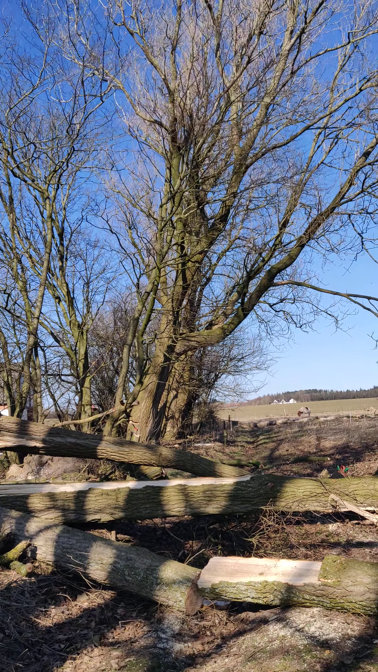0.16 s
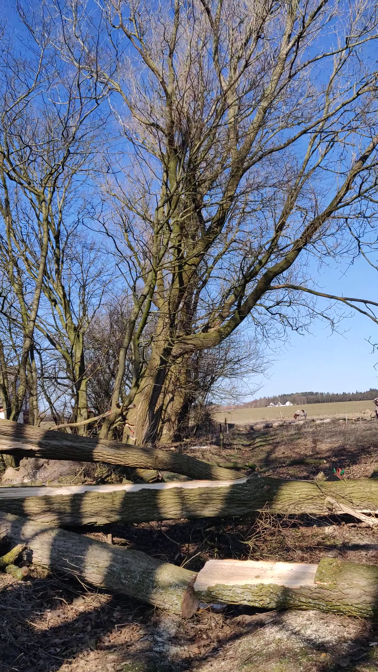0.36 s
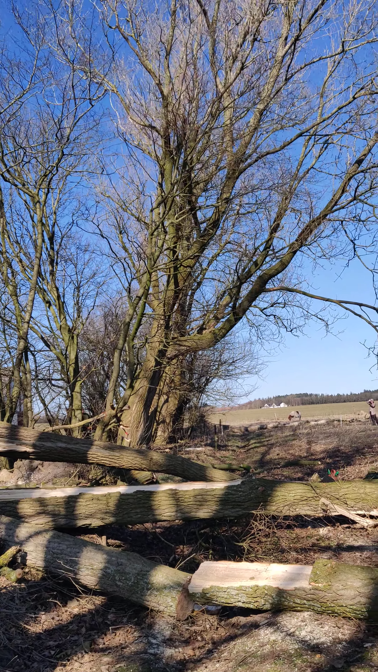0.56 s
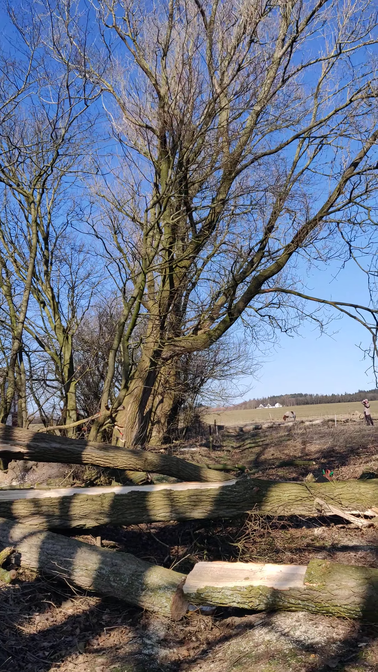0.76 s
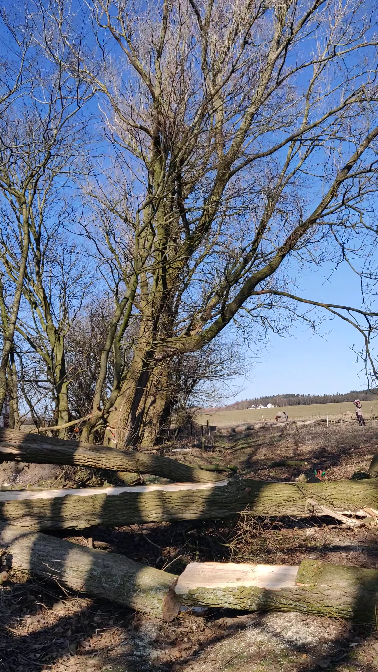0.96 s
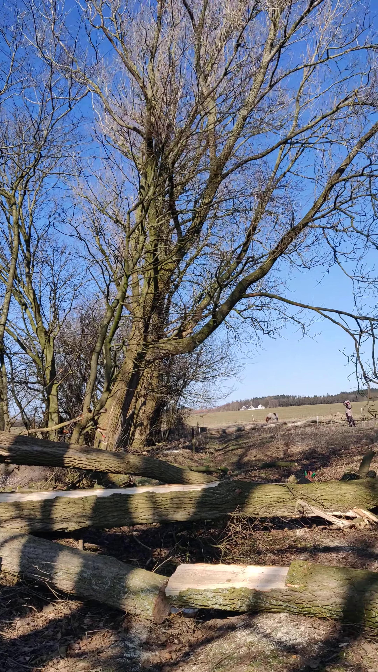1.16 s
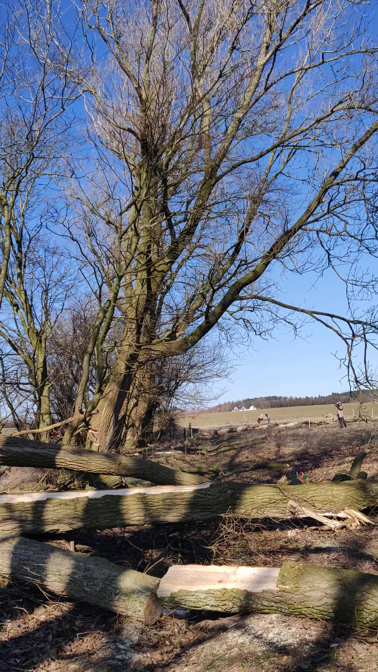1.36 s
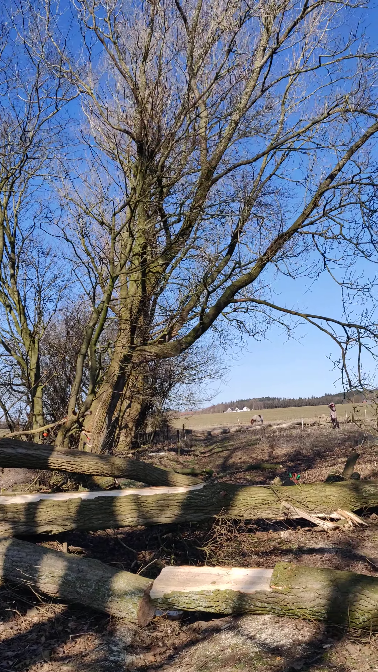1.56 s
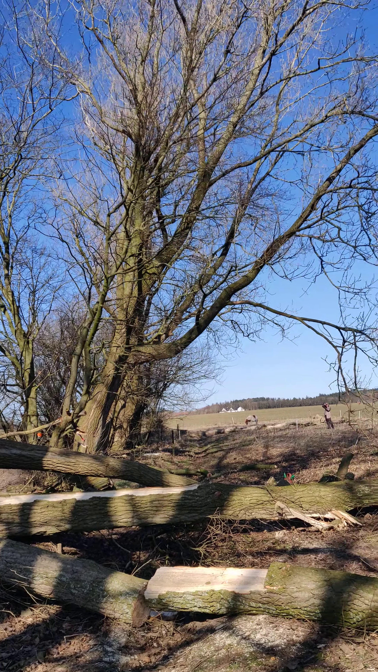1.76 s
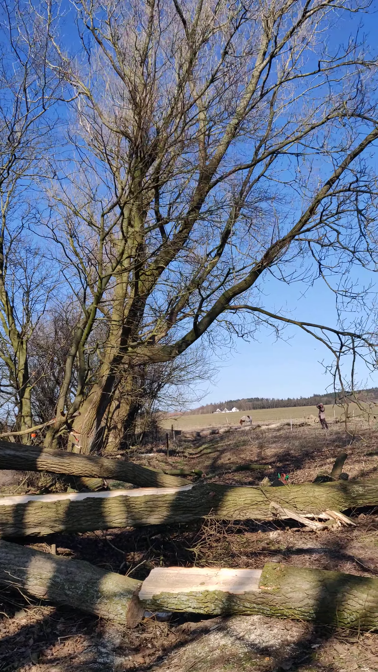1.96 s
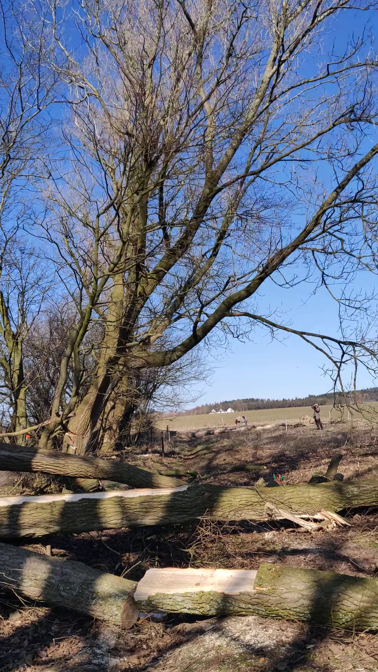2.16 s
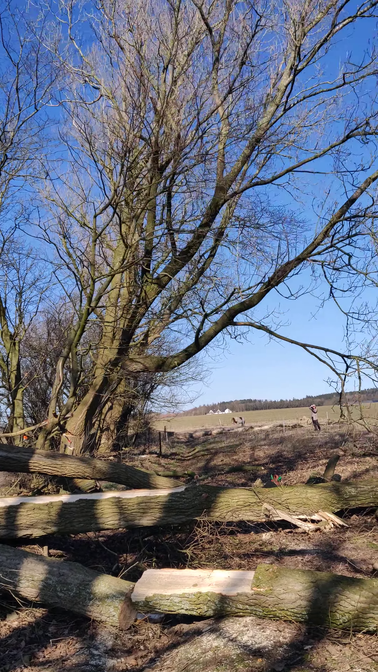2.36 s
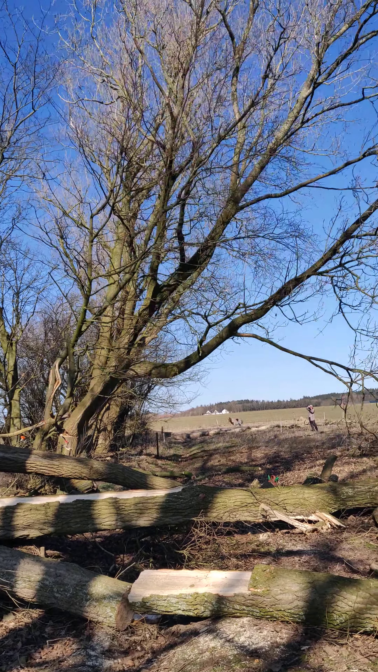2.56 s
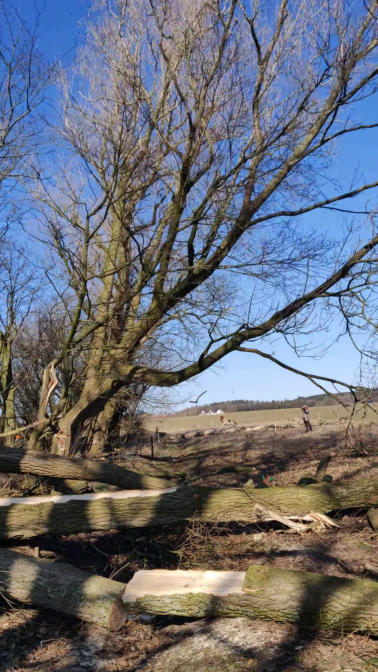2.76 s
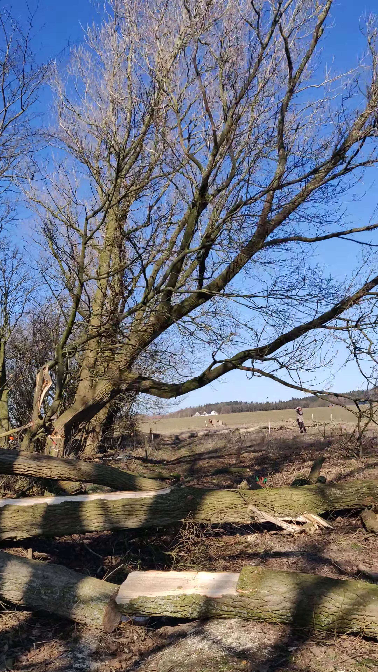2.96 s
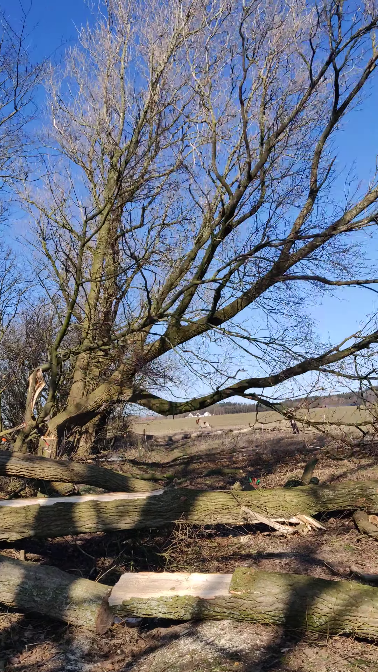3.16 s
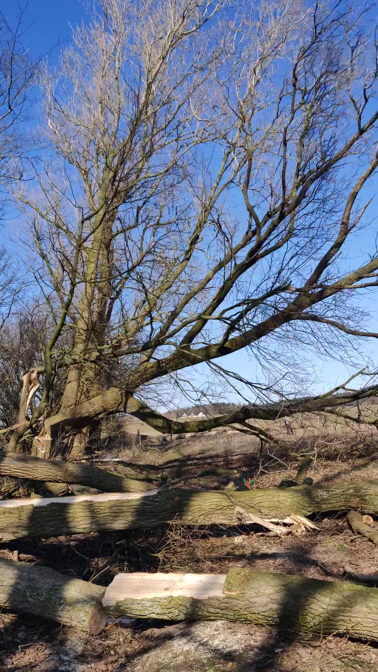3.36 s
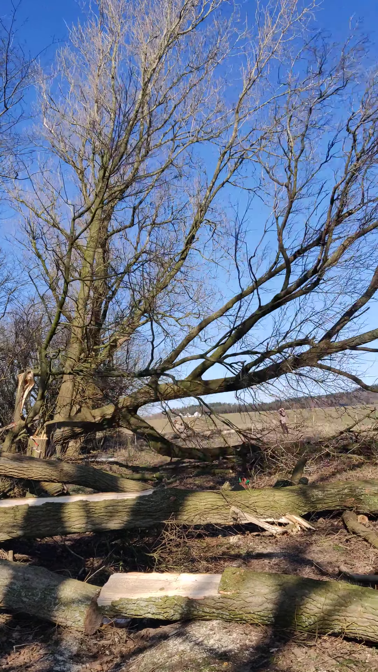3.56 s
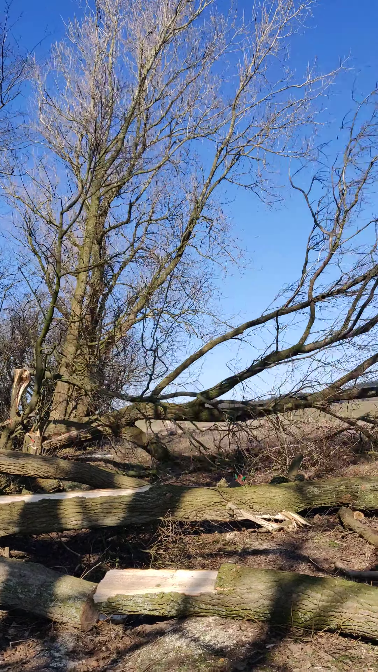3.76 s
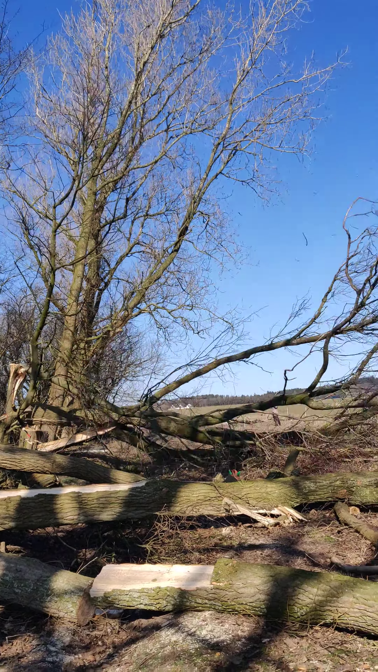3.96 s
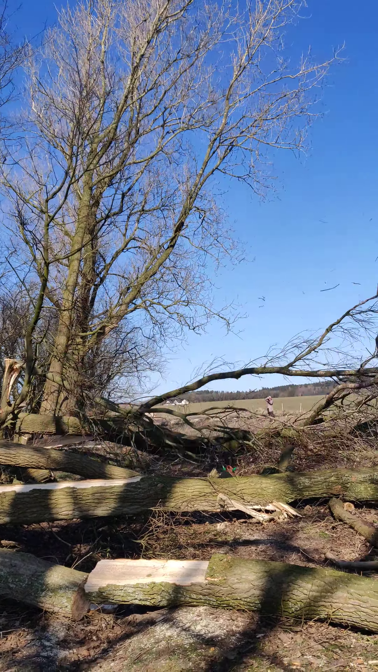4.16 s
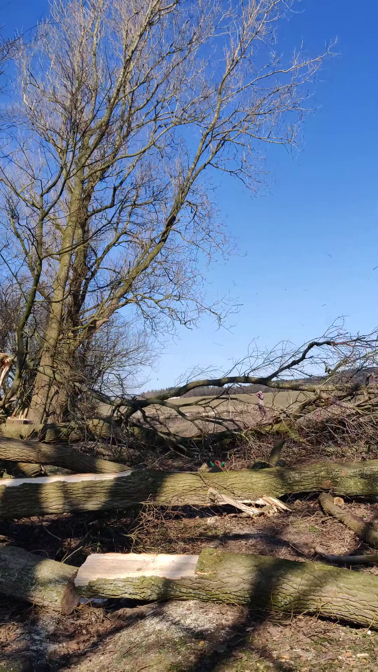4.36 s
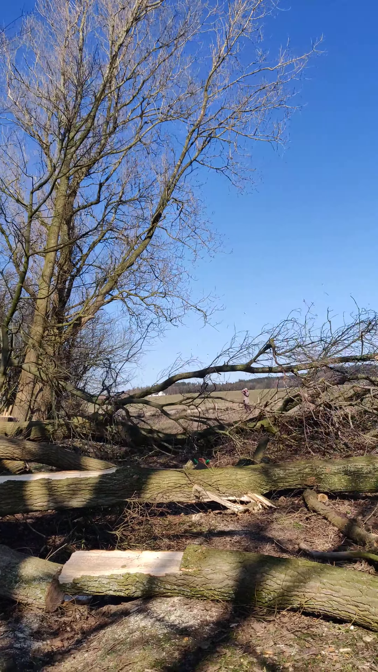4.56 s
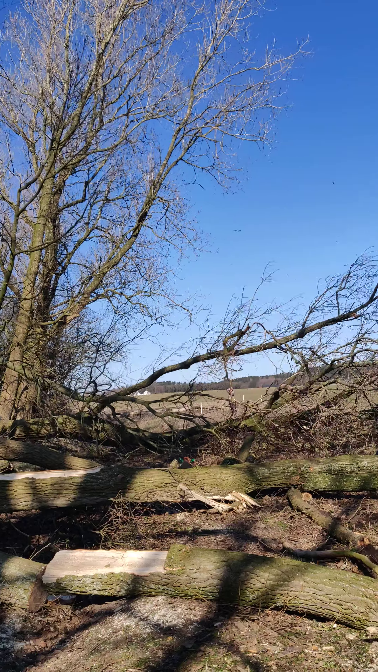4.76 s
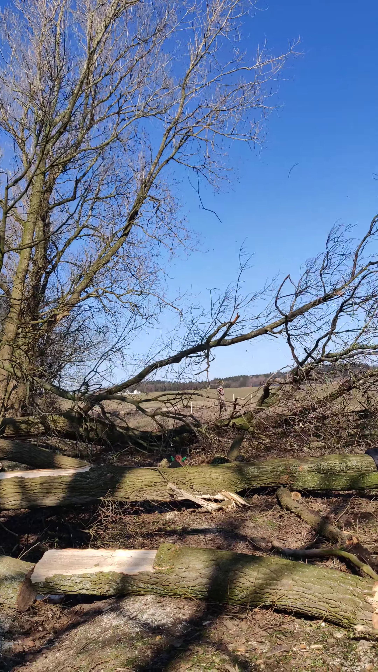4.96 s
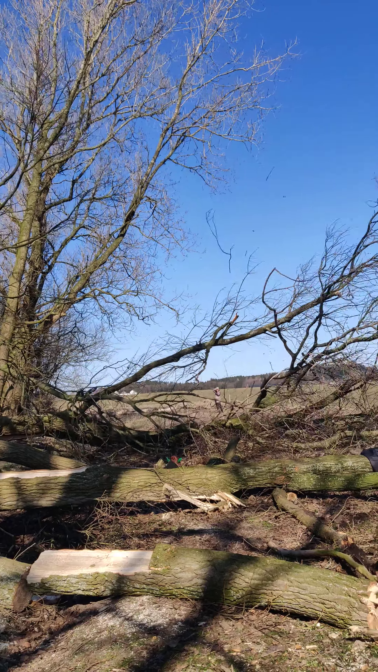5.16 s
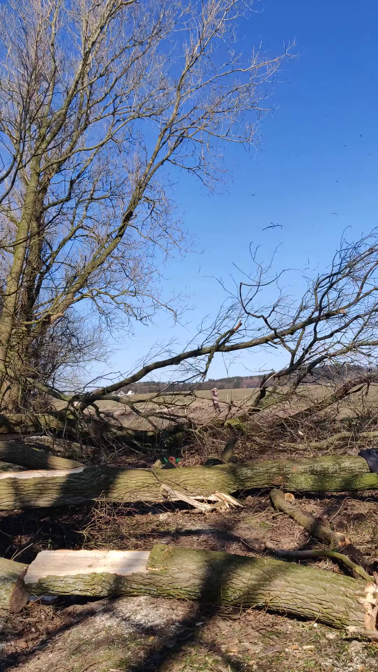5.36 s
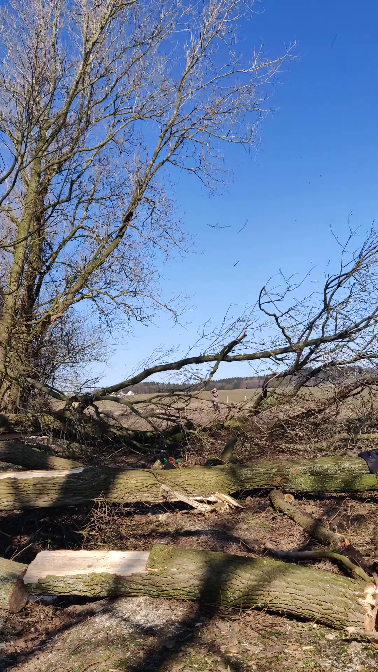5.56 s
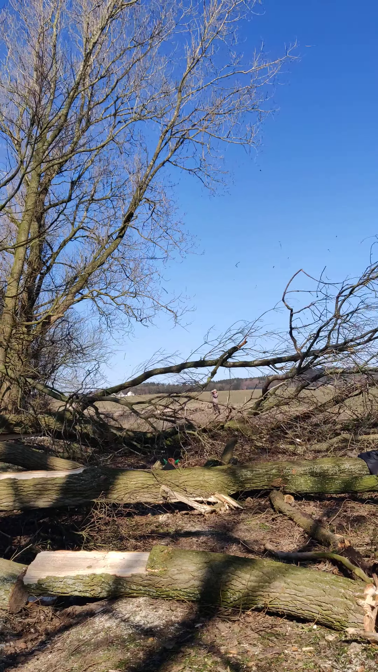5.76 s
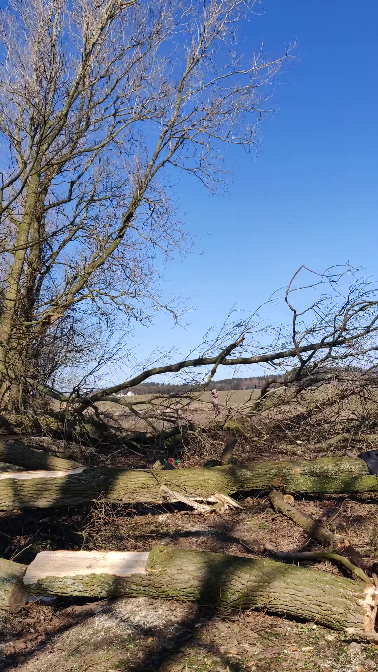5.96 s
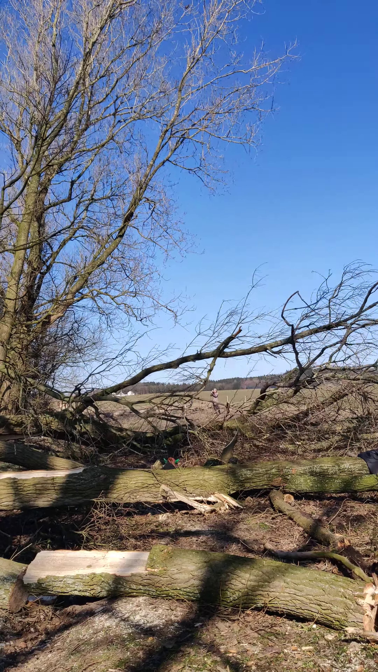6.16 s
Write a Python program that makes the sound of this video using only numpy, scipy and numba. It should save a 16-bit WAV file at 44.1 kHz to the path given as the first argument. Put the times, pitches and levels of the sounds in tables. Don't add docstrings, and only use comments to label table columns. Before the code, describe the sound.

Outdoors at a field edge, a leaning tree gives scattered dry cracks that grow louder and closer together. The trunk tears with hard woody snaps and low thumps, twigs rake and snap, then the crown hits the ground in a dense crunching crash with hollow knocks. It dies quickly to small snaps and pattering bits. Handheld phone some metres away, stereo, light wind rumble.

```python
import sys
import numpy as np
from scipy import signal
from scipy.fft import rfft, irfft
from scipy.io import wavfile
from scipy.ndimage import uniform_filter1d, minimum_filter1d, map_coordinates
from numba import njit

SR = 44100
rng = np.random.default_rng(int(sys.argv[2]) if len(sys.argv) > 2 else 0)


def elevation(decibels):
    levels = np.asarray(decibels, float)
    return 10 ** (levels / 20)


def master(y):
    cut = np.clip(np.atleast_2d(y).T, -1, 1)
    pcm = np.round(cut * 32767)
    wavfile.write(sys.argv[1], SR, pcm.astype(np.int16))


N = 273711


def wind():
    # [t/s, level/dB]
    gust_levels = [(0.0, -49), (0.52, -37.5), (0.78, -37), (0.9, -41), (1.55, -55), (1.76, -40.5),
                   (2.09, -36), (2.23, -52), (2.45, -36), (2.6, -42), (2.94, -39), (3.25, -34), (3.4, -40),
                   (3.77, -44), (4.13, -40), (4.5, -40.5), (5.64, -43), (6.0, -40), (6.1, -30), (6.21, -34)]
    both, left, right = rng.standard_normal((3, N))
    band = signal.butter(2, [22, 75], "band", fs=SR, output="sos")
    gust = signal.sosfilt(band, [1.26 * both + 1.65 * left, both + 0.9 * right])
    s, db = np.transpose(gust_levels)
    return gust / gust.std() * elevation(np.interp(np.arange(N) / SR, s, db))


@njit
def ring(start, lag, hz, cycles, size):
    out = np.zeros((2, N))
    for k in range(len(hz)):
        turn = np.exp((2j * np.pi - 1 / cycles[k]) * hz[k] / SR)
        shift = int(np.ceil(lag[k]))
        right = size[k] + 0j
        left = size[k] * turn ** (shift - lag[k])
        for i in range(start[k], min(N - 64, start[k] + int(6 * cycles[k] * SR / hz[k]))):
            out[0, i + shift] += left.imag
            out[1, i] += right.imag
            right, left = right * turn, left * turn
    return out


def grains(s, hz, cycles, size, bearing):
    lag_s = 7e-5 + .9e-4 * bearing
    lag = np.clip(lag_s * SR, -30, 30)
    start = np.clip(s * SR, 32, N).astype(np.int64)
    return ring(start, lag, hz, cycles + 0 * hz, size)


def by_size(hz, levels_db):
    typical_hz = [300, 1200, 5500, 13500]
    place = np.interp(np.log(hz), np.log(typical_hz), np.arange(len(typical_hz)))
    return sum(np.maximum(0, 1 - np.abs(place - k)) * db for k, db in enumerate(levels_db))


def crack_rows():
    # [t/s, splinter peak level/dB, wood knock re splinter/dB, tail share/dB]
    fibres = [(0.0334, -23, -5.5, -1), (0.0951, -25, -12, -1), (0.1992, -20.5, -23, -20),
              (0.2445, -35, -8, -1), (0.2625, -27, -4, 2), (0.311, -7, -5.5, -1.5),
              (0.3687, -14, -3.5, -1.5), (0.4284, -21, -27, 1.5), (0.5008, -17.5, -57, -6.5),
              (0.5666, -31, 0, -1), (0.6207, -27.5, -12, -26.5), (0.641, -24.5, 1, -12),
              (0.6697, -6, -19, -3), (0.748, -21, -5, -21), (0.7766, -27, -28, -6), (0.7971, -15, -46, -13),
              (0.8575, -4, -1, -5.5), (0.877, -16, -8, -21.5), (0.8975, -21, 9, -16),
              (0.9335, -21.5, 8.5, -10), (0.9961, -21.5, -15, -2.5), (1.0995, -18.5, 12, -11),
              (1.1063, -14, -1.5, -2.5), (1.1612, -22, -16, -19), (1.1774, -26, 7.5, -18),
              (1.1965, -25, -4, -16), (1.269, -15, -33, -8), (1.293, -8.5, -3, -4.5),
              (1.3963, -22, -9.5, -15), (1.511, -20, -21, -23)]
    hinge = [(1.5646, -3, -0.5, -26), (1.5734, -0.5, 2.5, -3), (1.5915, -13, -5, -13),
             (1.611, -16, -6, -14), (1.641, -21, 1, -6), (1.7471, -16, -3.5, -9), (1.805, -17, -3.5, -2),
             (1.8995, -15.5, -1.5, -4), (1.937, -3, -6, -27), (1.9563, -8.5, 8, -10),
             (1.978, -25.5, 5.5, 4.5), (2.0337, -28, 16, -26), (2.1049, -2.5, 2.5, -8),
             (2.1158, -12.5, 0.5, 0), (2.2915, -31, -14, 4), (2.3277, -24, -6, 7), (2.3456, -18, -10.5, -9),
             (2.3778, -30, 8.5, 0.5)]
    crown = [(2.4324, -23, 9, -12), (2.4514, 1, -3, -9), (2.4595, -4.5, 4.5, -2.5),
             (2.4736, -1.5, -10, 0.5), (2.5135, -9, 5.5, -1.5), (2.689, -12, -6, -13),
             (2.7048, -9.5, -5.5, -3), (2.7386, -4.5, -8, -1.5), (2.8849, 4, -29, -20),
             (2.9387, -9, -46, -7), (2.947, -5, -40, -11), (2.985, -11.5, -8.5, 0), (3.031, 9.5, -25, -14),
             (3.0491, -3.5, -33, -7), (3.115, -9, -18, 1.5), (3.1191, -10, -11, -13),
             (3.1642, -14, -6, -15), (3.177, -15, -3, -14), (3.204, -8, -24, -1), (3.223, 0.5, -37, -7.5),
             (3.2884, -9.5, -37, 2), (3.366, -9, -41, -11), (3.709, -10.5, 0, -2), (4.061, -19, 11, -1),
             (4.396, -14, -19, -2), (4.4257, -4.5, 0.5, -8), (4.458, -25, 10, -15), (4.5916, -13.5, -5, 0),
             (4.6763, -8, -9, -2)]
    debris = [(4.9445, -11, -18, -2.5), (5.075, -28, -38, -16.5), (5.257, -27, -32, -19),
              (5.369, -26.5, 0, -3), (5.4329, -0.5, -25, -10), (5.495, -17.5, -28, 1),
              (5.608, -20.5, -26, -3), (5.72, -22.5, -24, -9), (5.8227, -24, -14, 1.5),
              (5.883, -22, -37, 1), (6.0263, -15.5, -13, 0.5), (6.0348, -18, -37.5, -5),
              (6.108, -22, -49, -17), (6.127, -21, -31, -10), (6.181, -27, -19, 3)]
    thump_db = [-11, -10.5, -49, -19]
    tables = fibres, hinge, crown, debris
    s, db, mid_db, tail_db = np.transpose(sum(tables, []))[:, :, None]
    thump = np.repeat(thump_db, [len(rows) for rows in tables])[:, None]
    low_db = thump + 0.65 * mid_db
    return s, db, mid_db, low_db, tail_db


def steady(t):
    # [t/s, twig level/dB, heaviness (thick wood re twigs)/dB]
    running = [(0, -40, -1), (.56, -47, -1.5), (.8, -36.5, -11), (1.09, -48, 11), (1.43, -40, -8),
               (1.75, -41.5, 11), (2.07, -40, 20), (2.3, -44.5, 10), (2.65, -28.5, -5), (3.0, -33.5, -2),
               (3.3, -32.5, -18), (3.42, -29, -6), (3.47, -21, -7), (4.1, -21.5, -5), (4.448, -19, -7),
               (4.464, -30, 1), (5.08, -36.5, -6.5), (6.21, -40, -6)]
    # [t/s, peak level/dB, size (0 limbs, 1 branches, 2 twigs), fade per 10 dB/s (sign ignored)]
    surge_events = [(1.946, -17, 0.098, 0.07), (2.13, -24, .3, -0.4), (2.12, -28, 0.89, 0.24),
                    (2.46, -12.5, 0.92, 0.1), (2.49, -12, 1.46, 0.08), (2.69, -23.5, 1.1, -0.83),
                    (2.748, -20, 1.4, 0.13), (3.04, -37, 1.9, -0.5), (3.12, -27.5, 1.15, -2.5),
                    (3.215, -20, 2, 0), (3.26, -28.5, 0.18, 0.36), (3.445, -16.5, 1.63, 0.15),
                    (3.49, -18, 2, 0.09), (3.56, -12.5, 0.92, 0.1), (3.63, -13, 1.4, 0.04),
                    (3.72, -19, 1.64, 0.09), (3.79, -18.5, 1.4, 0.12), (3.861, -11.5, 0.29, 0.1373),
                    (3.918, -5.5, 0.63, 0.07), (3.98, -17, 1.1, 0.08), (4.018, -7.5, 0.61, 0.05),
                    (4.149, -17.5, .1, 0.0932), (4.21, -16, 1.24, 0.05), (4.267, -7, 0.63, 0.02),
                    (4.33, -20, 0.61, 0.1944), (4.4, -30, 1.3, 0.04), (4.6, -26, 1.8, 0.12),
                    (4.72, -30, 1.6, .2), (5.15, -53, 4.9, 0), (5.53, -38, 1.7, -0.7)]
    at, twigs, heavy = np.transpose(running)
    twigs, heavy = np.interp(t, at, twigs), np.interp(t, at, heavy)
    branches = twigs + 1 + 0.73 * heavy

    ground_from_s, ground_to_s, ramp_in_s, ramp_out_s = 3.49, 4.36, 0.1, 0.031
    away = np.maximum((ground_from_s - t) / ramp_in_s, (t - ground_to_s) / ramp_out_s)
    rest_db = -46.5 + 2 * (t > ground_to_s)
    limbs = np.maximum(rest_db, -27.5 - 10 * np.maximum(away, 0))

    s, db, size, fade = np.transpose(surge_events)[:, :, None]
    fade = np.abs(fade) + .004
    rise = np.where(s < ground_from_s - ramp_in_s, 0.0091, 0.45 * fade) + .001
    surge = db - 10 * np.clip(np.maximum((s - t) / rise, (t - s) / fade), 0, 12)
    power = []
    for k, base in enumerate((limbs, branches, twigs)):
        loss = np.maximum(8.5 * (k - size), 11.5 * (size - k))
        power.append(elevation(2 * base) + elevation(2 * (surge - loss)).sum(axis=0))

    still = np.clip((2.31 - t) / .15, 0, 1)
    dust_db = -25.5 - 10 * still
    return power + [power[-1] * elevation(2 * dust_db)]


def breakage(t, swell_s=0.0054):
    tail_t60 = [0.5, 0.48, 0.43, 0.33]
    tail_start = [-4.5, -6, -16, -45.5]
    s, db, mid_db, low_db, tail_db = crack_rows()
    since = np.maximum(t - s, 0)
    swell = 1 - np.exp(-since / swell_s)
    levels = []
    for base, start, t60, power in zip(tail_start, (low_db, mid_db, 0, 0), tail_t60, steady(t)):
        decay_db = 60 * since / t60
        tails = elevation(2 * (db + start + tail_db + base - decay_db)) * swell
        levels.append(10 * np.log10(tails.sum(axis=0) + power))
    return levels


def crash(count=130000, bunch_s=0.016, step_s=0.0018):
    when, pick, odd, sign = rng.random((4, count))
    when = when * N / SR
    hz = 100 + 16400 * pick ** 1.2
    side = rng.standard_normal(count)
    bearing = 0.783 * side * np.abs(side)
    t = np.arange(0, N / SR, step_s)
    low, mid, high, top = (np.interp(when, t, db) for db in breakage(t))
    bunch_grid = rng.standard_normal((1000, 16))
    bunch = map_coordinates(bunch_grid, [when / bunch_s, np.log2(hz / 100)], order=1)
    db = by_size(hz, [low, mid, high, top + 28])
    db = db - 2.0 * np.log(1 - .999 * odd) + 2.03 * bunch
    return grains(when, hz, 2.79 + hz / 5000, elevation(db - 16) * np.sign(sign - .5), bearing)


def crackle(count=900, size=10):
    when, odd, side, sign = rng.random((4, count, 1))
    when = when * N / SR
    t = np.arange(0, N / SR, .008)
    hz = 1800 * 6.0 ** rng.random((count, size))
    twigs_db = np.interp(when, t, breakage(t)[2])
    db = twigs_db - 8 - 3 * np.log(1 - .995 * odd)
    spread = lambda v: (v + 0 * hz).ravel()
    strength = elevation(db - 10.5) * np.sign(sign - .5)
    return grains(spread(when), hz.ravel(), 1.1, spread(strength), spread(3 * (side - .5)))


def cracks(count=140):
    s, db, mid_db, low_db, _ = crack_rows()
    pick, wait, sign, side = np.moveaxis(rng.random((len(s), count, 4)), 2, 0)
    hz = 130 * (16500 / 130) ** pick ** .7
    run_s = .8 * (.0013 + .4 / hz)
    when = s - .0003 - np.log(1 - wait) * run_s
    level = by_size(hz, [db + low_db, db + mid_db, db, db + 3.5]) - 13.5
    size = elevation(level) * np.sign(sign - .5) * (1 - wait) ** .3
    first = wait < .15
    when = np.where(first, s, when)
    size = np.where(first, elevation(-2.5) * np.abs(size), size)
    bearing = 1.3 * (side[:, :1] - .5) + 1.33 * (side - .5)
    return grains(when.ravel(), hz.ravel(), 1.5, size.ravel(), bearing.ravel())


def blows(table, gain_db):
    s, db, hz, t60 = np.transpose(table)
    cycles = t60 * hz / np.log(1000)
    return grains(s + 0.001083, hz, cycles, elevation(db + gain_db), 0 * s)


def rings(table, gain_db):
    s, db, hz = np.transpose(table)
    t60 = 0.029 * (hz / 500) ** -0.35
    return blows(np.transpose([s, db, hz, t60]), gain_db)


def lean_rings():
    # [t/s, peak level/dB, f/Hz]
    lean_modes = [(0.309, -19, 1900), (0.323, -16.5, 680), (0.351, -21, 545), (0.875, -14, 427),
                  (1.098, -13.5, 710.0), (1.098, -11, 1590), (1.572, -6, 1640), (1.573, -20, 2240.0),
                  (1.591, -10, 1410), (1.61, -19, 2290), (1.623, -12, 1230.0), (1.65, -15, 1720.0),
                  (1.658, -18, 240.0), (1.938, -10.5, 450.0), (1.956, -17, 3100.0), (1.956, -7, 365),
                  (1.966, -10, 388), (2.102, -14, 2250), (2.118, -16, 1520), (2.122, -19, 790),
                  (2.131, -15, 674), (2.449, -10, 1620), (2.449, -4, 865), (2.456, -9.5, 445),
                  (2.473, -16, 1500), (2.5, -10, 387), (2.503, -16, 2220.0), (2.511, -14, 486),
                  (2.52, -18, 2400), (2.522, -19, 2650.0), (2.53, -14.5, 1550.0), (2.814, -18, 780.0),
                  (2.829, -19, 1490.0), (3.118, -23, 1830)]
    return rings(lean_modes, -6.0)


def knocks():
    # [t/s, peak level/dB, f/Hz, t60/s]
    knock_modes = [(0.312, -7, 780, 0.011), (0.857, -7, 350, 0.055), (0.858, -7.5, 905, .03),
                   (0.858, -12, 1920, .02), (0.312, -13, 348, 0.024), (1.177, -20, 1980, .012),
                   (1.292, -21, 1100, .015), (1.574, -8, 950, .03), (1.594, -12, 600, .03),
                   (1.099, -22, 1530, .015), (1.177, -18, 1580, 0.015), (1.29, -13.5, 465, 0.016),
                   (1.292, -13.5, 1530, 0.017), (1.957, -10, 393, 0.044), (2.106, -1, 1960, 0.015),
                   (2.107, -12, 430, 0.024), (3.553, -9, 458, .04), (3.586, -12.5, 1500, 0.035),
                   (3.919, -2.5, 930, 0.028), (4.049, -5, 1190, 0.015), (4.062, -12, 444, 0.011),
                   (4.268, -10, 866, 0.028), (4.456, -1.5, 893, 0.021), (4.942, -7, 1720, 0.014),
                   (4.943, -10.5, 2810, 0.0078), (5.432, -9, 2740, 0.017), (5.851, -24, 2260, 0.026),
                   (6.022, -21, 1740, 0.0082), (6.023, -19.5, 1320, 0.018), (4.474, -19, 800, .025),
                   (4.49, -18, 850, .025), (4.943, -19, 2240, .01), (4.943, -17, 3300, .008)]
    return blows(knock_modes, -7.5)


def thuds():
    # [t/s, peak level/dB, f/Hz, t60/s]
    thud_modes = [(1.574, -4.5, 97, 0.11), (1.955, -7.5, 84.4, 0.18), (2.116, -6.5, 392, 0.039),
                  (2.451, -12, 90.5, 0.11), (3.257, -16, 64.6, 0.056), (3.738, -14, 175, 0.06),
                  (3.87, -8, 63, 0.13), (3.918, -9, 243, 0.11), (4.017, -10, 196, 0.085),
                  (4.233, -5.5, 350, 0.016), (4.267, -9.5, 144, 0.11), (6.023, -17, 64, 0.065),
                  (6.109, -17, 70.0, 0.069)]
    return blows(thud_modes, -6.5)


def ticks():
    # [t/s, peak level/dB, f/Hz, t60/s]
    tick_modes = [(2.7387, -6, 5700, 0.0065), (2.9372, -10, 6100, 0.0092), (3.03, 0, 5700, 0.005),
                  (3.2034, 3, 5500, 0.0024), (2.7526, -6, 5640, .004), (2.772, -7, 3000, .003),
                  (3.2151, -10, 5500, 0.0026), (3.2996, -6, 5500, 0.0027), (3.3144, -8, 5500, .003),
                  (3.4766, -3, 5600, .003), (3.5758, 1, 5600, .003), (3.6585, -6, 5600, 0.0027),
                  (3.6855, -3, 5700, .003), (3.7381, -2, 5650, .003), (4.0613, -5, 6500, 0.0034),
                  (4.3114, -4, 5600, 0.0027), (4.436, -6, 5600, .003), (4.4442, -5, 5660, .003),
                  (4.6818, -6, 4000, .002), (4.7976, -14.5, 5600, 0.0026), (5.089, -22, 5600, 0.0027),
                  (5.1417, -19, 5630, .003), (5.159, -24, 5600, .003), (5.6217, -18, 5600, .003),
                  (5.6815, -22.5, 5600, .003), (5.891, -22, 5600, 0.0027), (4.9435, -13, 5200, 0.0043),
                  (5.4308, 3.5, 6080, 0.007), (6.108, -15, 7200, 0.0037)]
    return blows(tick_modes, -7.5)


def fall_rings():
    # [t/s, peak level/dB, f/Hz]
    fall_modes = [(3.444, -20, 2240.0), (3.448, -13, 970.0), (3.473, -16, 2200), (3.547, -16, 2920),
                  (3.589, -8, 1020), (3.591, -14, 500.0), (3.611, -10.5, 1570), (3.709, -13.5, 1550),
                  (3.723, -14.5, 393), (3.731, -23, 3190.0), (3.777, -14.5, 1980), (3.783, -10, 130.0),
                  (3.828, -14, 950.0), (3.887, -17, 1850.0), (3.887, -13, 540.0), (3.9, -17, 2560.0),
                  (3.938, -5.5, 840.0), (3.979, -18, 2900), (3.989, -9, 456), (3.994, -13, 1640.0),
                  (3.998, -5.5, 940), (4.015, -21, 3000), (4.016, -20, 2440), (4.06, -15, 2150),
                  (4.061, -6, 1140.0), (4.063, -14, 1860), (4.228, -18, 1920.0), (4.24, -14, 1210.0),
                  (4.251, -12, 400), (4.264, -15, 1410), (4.358, -16, 1550.0), (4.474, -17, 690.0),
                  (4.598, -21.5, 131), (4.672, -20, 2000.0)]
    return rings(fall_modes, -5.5)


def port(x, colour, size=1024):
    hz, db = np.transpose(colour)
    bins = np.log(np.arange(size + 1) * SR / 2 / size + 1)
    cepstrum = irfft(np.log(elevation(np.interp(bins, np.log(hz), db))))
    cepstrum[1:size] *= 2
    cepstrum[size + 1:] = 0
    response = irfft(np.exp(rfft(cepstrum)))[:size]
    return signal.fftconvolve(x, response)[:N]


def scene():
    # [f/Hz, level/dB]
    ground_colour = [(60, 1.5), (140, 0), (220, 4), (350, 3.5), (480, 3.5), (630, 0), (850, 4.5),
                     (1250, 2.5), (1700, 6.5), (2600, 3.5), (4000, 5), (6000, 7.5)]
    tree = cracks() + ticks() + knocks() + thuds() + lean_rings() + fall_rings() + crash()
    air = wind()
    return np.array([port(x, ground_colour) for x in tree + crackle()]) + air


def starve(x, size=1024, count=2):
    # [f/Hz, share of bands lost]
    lost_share = [(1500, 0.01), (2600, .08), (3300, .2), (4500, .2), (5200, 0.02), (6500, 0.08),
                  (7300, 0.3), (8800, .15), (9700, 0.1), (11400, .1), (12300, 0.45), (14000, .3),
                  (16000, 0.1)]
    hz, _, z = signal.stft(x, SR, nperseg=size)
    bins, frames = len(hz), z.shape[2]
    chance = rng.random((bins // count + 1, frames // count + 1))
    chance = chance.repeat(count, axis=0).repeat(2 * count, axis=1)[:bins, :frames]
    lost = chance < np.interp(hz, *np.transpose(lost_share), left=0)[:, None]
    draw_low, draw_high = rng.random((frames // count + 1, 2)).repeat(count, axis=0)[:frames].T
    low = 9500 + 400 * (2 * draw_low - 1)
    high = 11750 + 700 * (2 * draw_high - 1)
    z = z * np.where((hz[:, None] > low) & (hz[:, None] < high), elevation(-70), 1)
    return signal.istft(z * np.where(lost, elevation(-34), 1), SR, nperseg=size)[1][:, :N]


def roll_off(x):
    return signal.sosfilt(signal.butter(12, 16860, fs=SR, output="sos"), x)


def record(dry):
    # [f/Hz, level/dB]
    left_colour = [(20, 0.5), (700, 5), (1300, 2.5), (3000, 6), (5800, 14.5), (7000, 3.5), (8200, -8),
                   (9200, -26.5), (10500, -60), (13000, -19), (15600, -52), (16200, -69)]
    # [f/Hz, level/dB]
    right_colour = [(20, 3), (700, 3), (1300, 5), (3000, 6), (5000, 6.5), (8500, 6.5), (9400, -5.5),
                    (9900, -7), (11200, -14.5), (12200, -19.5), (15600, -12.5), (16200, -81)]
    x = np.array([port(dry[0], left_colour), port(dry[1], right_colour)])
    hold = minimum_filter1d(np.minimum(1, .96 / (np.abs(x) + 1e-9)), size=129)
    limited = x * uniform_filter1d(hold, size=65)
    return roll_off(starve(limited))


dry = scene()
out = record(dry)
master(out)
```